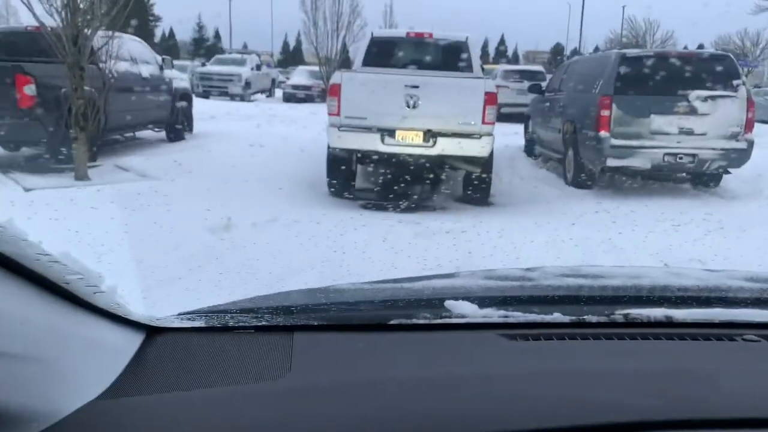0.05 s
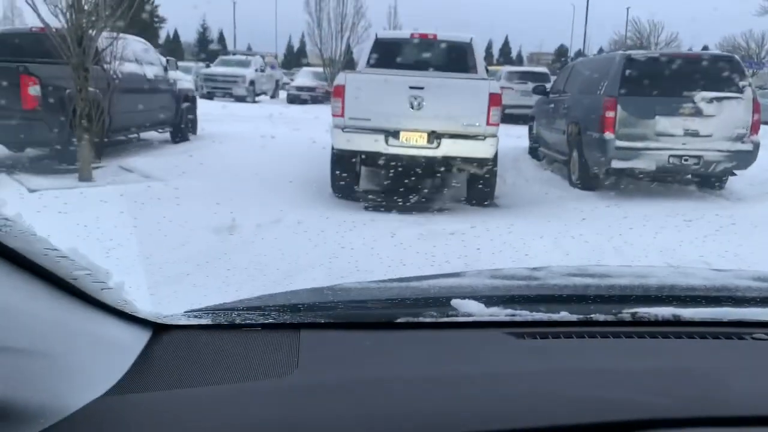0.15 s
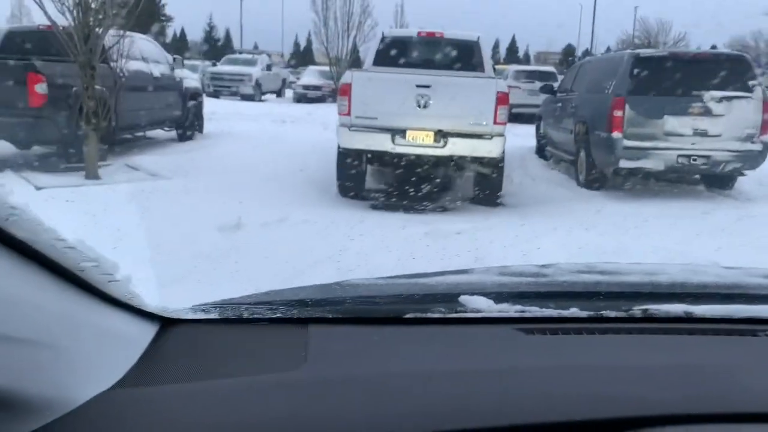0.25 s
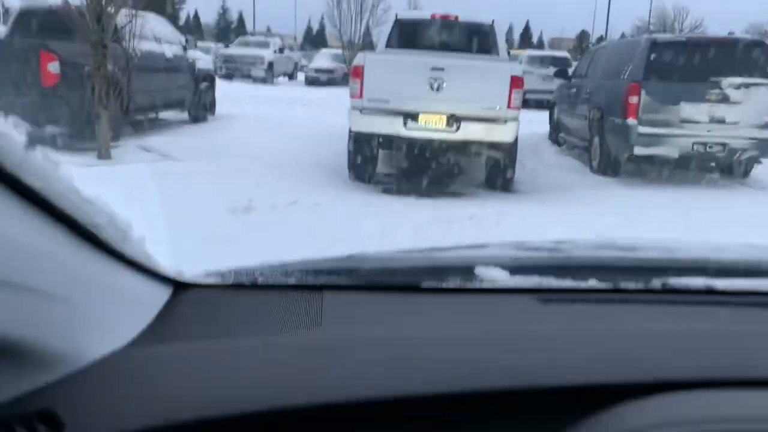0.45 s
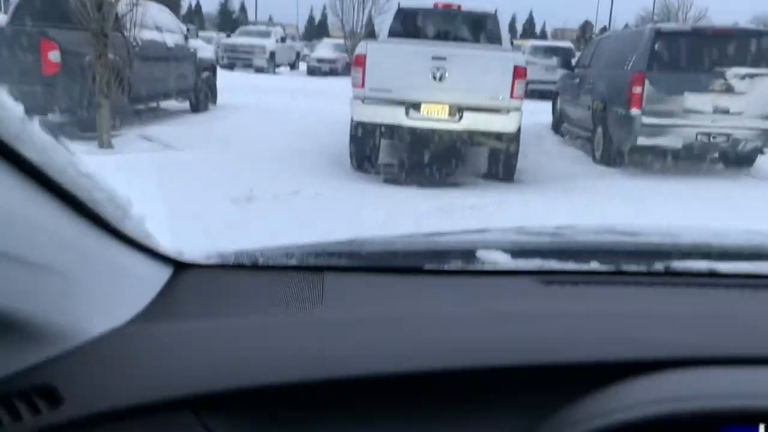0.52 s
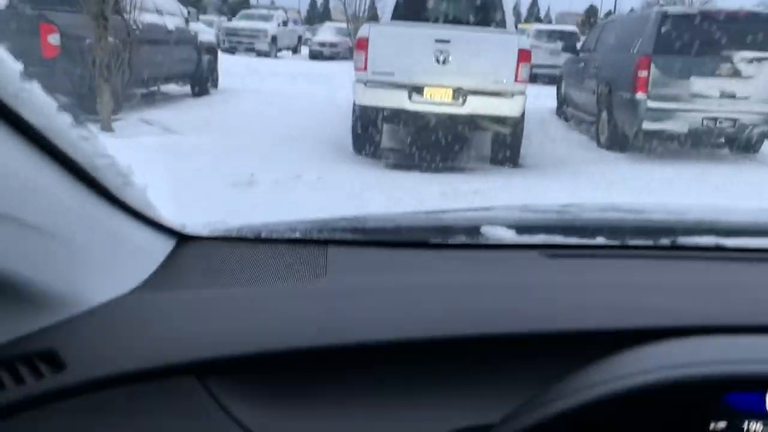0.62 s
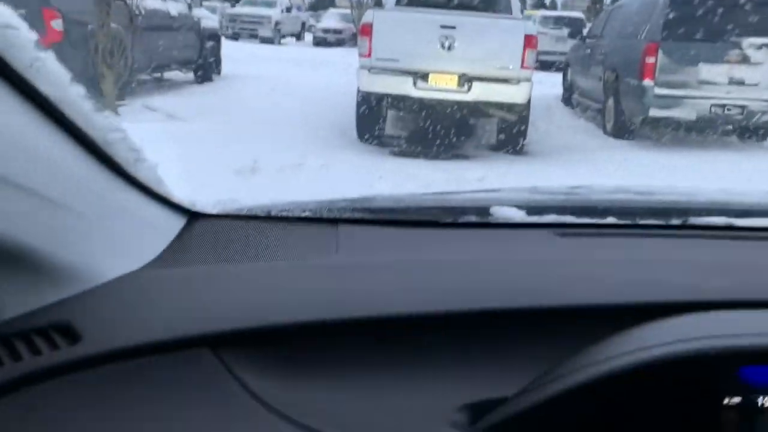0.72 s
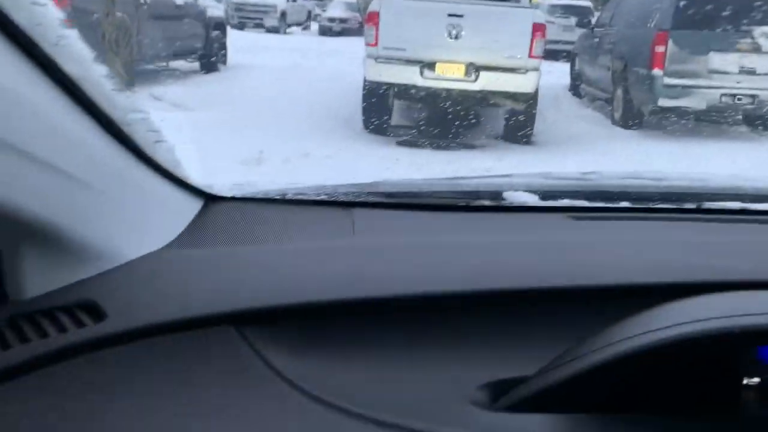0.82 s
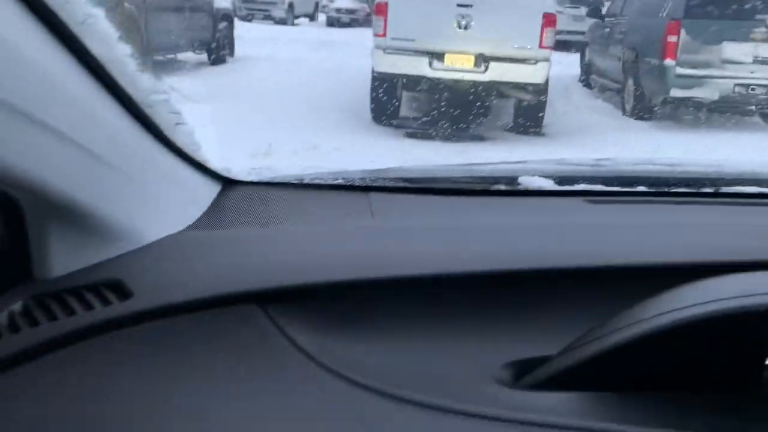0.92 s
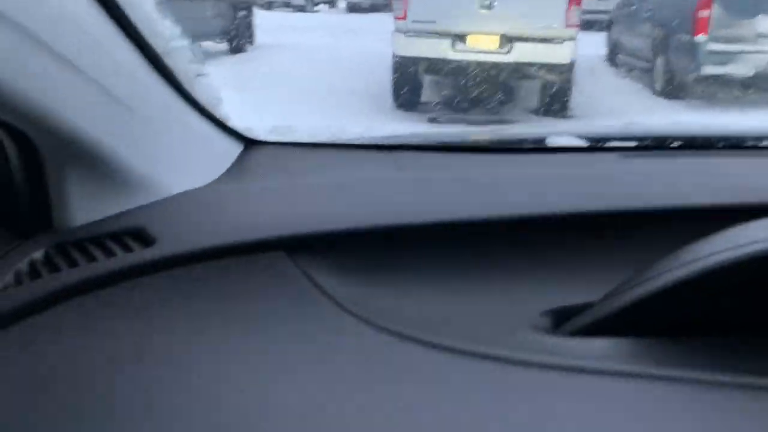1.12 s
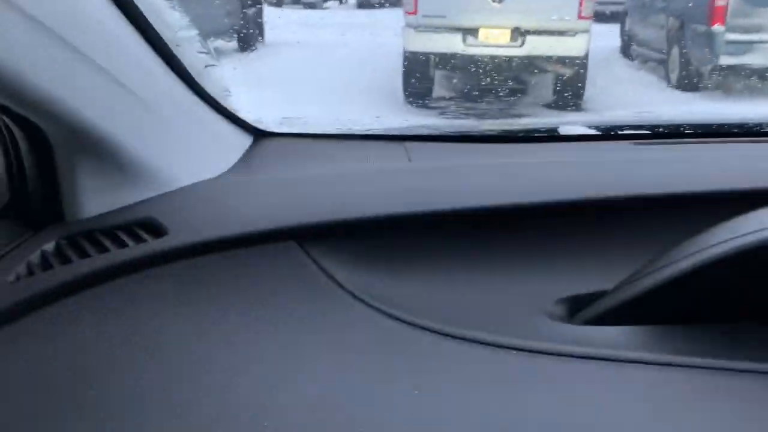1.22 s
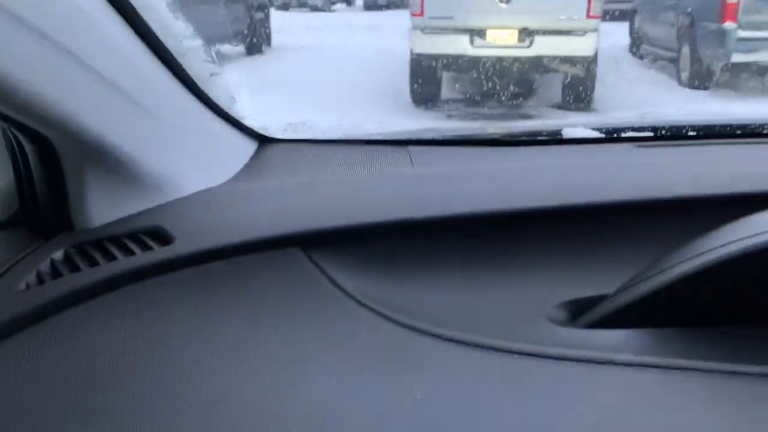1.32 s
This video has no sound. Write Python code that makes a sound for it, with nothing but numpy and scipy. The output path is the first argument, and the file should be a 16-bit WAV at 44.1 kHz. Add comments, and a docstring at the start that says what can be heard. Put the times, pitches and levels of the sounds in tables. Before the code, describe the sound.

Low thumping judder of fabric rubbing a hand-held phone inside a parked car, over dull rumble

```python
"""Handling a phone in a parked car

Inside a parked car, fabric sticks and slips against a hand-held phone with two ports in low thumping
judder: a low tone with a few multiples and loose shaking. Cloth rustles in dense tiny noise grains,
two soft knocks ring the trim, squeaks are short gliding tones and ticks are puffs of narrow noise.
Under it all lies the dull rumble of the car's fan and vents, noise with a slow swell."""
import sys
import numpy as np
from scipy import signal
from scipy.fft import rfft, irfft
from scipy.io import wavfile
from scipy.ndimage import uniform_filter1d

SR = 44100
rng = np.random.default_rng(int(sys.argv[2]) if len(sys.argv) > 2 else 0)


def wav_record(signal):
    """Record a signal, one row per channel, as 16-bit PCM in the file named by sys.argv[1]."""
    frames = np.transpose(np.atleast_2d(signal))
    bounded = np.clip(frames, -1, 1)
    # unit amplitude maps onto the largest positive 16-bit level
    quanta = np.round(bounded * 32767).astype(np.int16)
    wavfile.write(sys.argv[1], SR, quanta)


N = 59535


def undb(db):
    """Turn decibels into a plain multiplier."""
    return 10 ** (np.asarray(db) / 20)


def curve(table, column=1):
    """A table column joined by straight lines in time."""
    rows = np.array(table)
    return np.interp(np.arange(N) / SR, rows[:, 0], rows[:, column])


def over_hz(table, hz):
    """A table read on a log-frequency axis."""
    rows = np.array(table)
    return np.interp(np.log(hz + 1), np.log(rows[:, 0]), rows[:, 1])


def rms1(x):
    """Scale a sound to an average (RMS) level of 1."""
    return x / np.sqrt(np.mean(x ** 2))


def walk(rate):
    """Random levels, `rate` new ones a second, smoothed twice; spread near 1."""
    hold = int(SR / rate)
    steps = np.repeat(rng.standard_normal(N // hold + 1), hold)
    smooth = uniform_filter1d(uniform_filter1d(steps, hold), hold)
    return 1.166 * smooth[:N]


def band(x, lo_hz, hi_hz):
    """Keep only the frequencies between two limits."""
    sos = signal.butter(2, [lo_hz, min(hi_hz, .45 * SR)], "band", fs=SR, output="sos")
    return signal.sosfilt(sos, x)


def ports(shared, other, colour=None):
    """Two ports: the right hears `shared`; the left mixes it with `other`, a little late."""
    # how alike the two ports are: (frequency [Hz], likeness [0-1])
    alike_table = [(60, 0.99), (130, 1), (290, 0.84), (640, 0.5), (1400, 0.48), (3100, 0), (6000, 0.04),
                   (8000, 0.97), (16000, .995)]
    # left over right: (frequency [Hz], level [dB])
    lean_table = [(60, -0.5), (110, 3), (200, 0.5), (380, 3.5), (700, -0.5), (1290, 2.5), (2380, 1.5),
                  (4400, -0.5), (8120, -1.0), (15000, 0.5)]
    # the path round the phone's body is longer for the treble: (frequency [Hz], left lag [ms])
    lag_table = [(900, .12), (1500, .15), (8600, .1744), (11100, .1802), (13400, .1866)]
    hz = np.arange(N // 2 + 1) * SR / N
    alike = np.clip(over_hz(alike_table, hz), 0, 1)
    shape = 1 if colour is None else undb(over_hz(colour, hz))
    lean = undb(over_hz(lean_table, hz) / 2)  # half to each side
    right = rfft(shared)
    left = alike * right + np.sqrt(1 - alike * alike) * rfft(other)
    left = left * np.exp(-2j * np.pi * hz * over_hz(lag_table, hz) / 1000)
    return irfft(shape * np.array([left * lean, right / lean]), N)


def judder():
    """Fabric sticks and slips on the phone: a few multiples of the slip rate, with loose shaking."""
    # fabric judder before wobble and flicker: (time [s], slip rate [Hz], fundamental [dB],
    # second multiple [dB], third multiple [dB])
    slip_table = [(0.0, 53.1, -75, -81, -45), (0.036, 51.54, -54, -47.5, -77),
                  (0.108, 49.64, -43.5, -54, -65), (0.134, 51.06, -55, -82, -74),
                  (0.172, 50.8, -75, -61, -61), (0.194, 50.5, -51, -63, -59), (0.21, 51.9, -40, -53, -41.5),
                  (0.244, 52.1, -32, -33.5, -35.5), (0.266, 56.04, -34, -60, -53),
                  (0.284, 56.94, -38, -40, -86), (0.304, 55.94, -47.5, -58, -50.5),
                  (0.335, 56.55, -34.5, -65, -45), (0.352, 57.04, -33.5, -60, -46),
                  (0.38, 57.1, -43.5, -64, -50.5), (0.41, 57.3, -37, -64, -45.5),
                  (0.458, 57.58, -46.5, -72, -53.5), (0.496, 57.23, -41.5, -44.5, -52),
                  (0.548, 54.5, -40.5, -58, -49.5), (0.57, 54.64, -47, -50, -70),
                  (0.616, 50.71, -64, -58.5, -50), (0.65, 50.43, -49, -64, -49),
                  (0.672, 50.38, -46, -62, -44.5), (0.695, 50.3, -37.5, -57, -42),
                  (0.735, 50.16, -31, -62, -44), (0.774, 48.77, -32.5, -69, -46),
                  (0.812, 44.85, -26.5, -40, -36), (0.834, 41.8, -19.5, -43, -38),
                  (0.864, 40.8, -43, -40, -42.5), (0.886, 39.97, -32, -38.5, -64),
                  (0.91, 40.9, -41.5, -43.5, -64), (0.936, 42.15, -44, -40.5, -45),
                  (0.958, 43.52, -36, -43, -49.5), (0.986, 45.85, -25, -55, -56),
                  (1.01, 44.7, -33, -39.5, -56), (1.022, 43.72, -31.5, -69, -63),
                  (1.056, 41.42, -36.5, -51, -51), (1.09, 43.25, -57, -70, -39.5),
                  (1.142, 46.45, -41, -39, -68.5), (1.184, 47.04, -54, -52, -48),
                  (1.202, 47.3, -46.5, -59, -62.5), (1.296, 49.65, -41.5, -48, -53),
                  (1.326, 47.87, -42, -60, -64), (1.35, 45.38, -75, -62, -40.5)]
    wobble = .015  # random spread of the slip rate, as a fraction
    flicker_db, drift_rad = 1.3, 0.25  # each multiple's random level; its phase wander
    fourth_db = -10  # fourth multiple against the third
    shake_db, shake_hz = -14, (40.5, 140)  # loose shaking against the fundamental; its band
    rate = curve(slip_table) * (1 + wobble * walk(20))
    turn = 2 * np.pi * np.cumsum(rate) / SR + 2 * np.pi * rng.random()
    levels = [curve(slip_table, column=k) for k in (2, 3, 4)]
    levels.append(levels[-1] + fourth_db)
    tone = 0
    for k, level in enumerate(levels):
        loudness = np.sqrt(2) * undb(level + flicker_db * walk(35.0))
        # higher multiples wander more
        tone = tone + loudness * np.cos((k + 1) * turn + drift_rad * k * walk(13.03))
    shaking = rms1(band(band(rng.standard_normal(N), *shake_hz), *shake_hz))
    x = tone + undb(levels[0] + shake_db) * shaking
    return ports(x, np.roll(x, 60))  # shifted by 60 samples, about 1.4 ms


def rustle():
    """Cloth rubs in dense tiny fibre slips of uneven size, in a patchy flow."""
    # cloth rustle, level within 2-8 kHz before its patchiness: (time [s], level [dB])
    flow_table = [(.015, -65.5), (.045, -88), (.09, -84), (.13, -75), (.17, -66), (.23, -76), (.35, -71.5),
                  (.45, -75), (.56, -74), (.65, -69.5), (.72, -66), (.79, -62), (.87, -65), (.95, -68.5),
                  (1.03, -72.5), (1.07, -90), (1.12, -81), (1.16, -104), (1.33, -92)]
    # colour of the cloth: (frequency [Hz], relative level [dB per Hz])
    cloth_colour = [(500, -18), (900, -3.5), (1300, 0), (2000, -3), (3000, -7), (4000, -5), (5200, -9),
                    (6700, -10), (8000, -12), (10000, -14.5), (12500, -27), (16000, -15.5)]
    grains_per_s, grain_spread_db = 6000, -0.5  # the spread is the average weakening of a grain
    grains = []
    for _ in range(2):
        happens = rng.random(N) < grains_per_s / SR
        size = undb(grain_spread_db * rng.exponential(size=N))
        grains.append(rng.standard_normal(N) * happens * size)
    x = ports(grains[0], grains[1], cloth_colour)
    x = x / np.std(band(x, 2000, 8000))
    return x * undb(curve(flow_table) + 1.14 * walk(13.23))


def knocks():
    """A soft push rings the trim at several pitches, each dying away at its own pace."""
    # soft knocks: (time [s], drive level [dB], left over right [dB], left late by [ms],
    # frequency where the ring is halved, duller above [Hz])
    knock_table = [(.2, -42.5, 8.5, 0.028, 636), (1.0348, -40.5, 1.5, 0.28, 3000)]
    # ringing modes of the trim: (frequency [Hz], relative level [dB], time to fall 60 dB [s])
    trim_modes = [(526, 5.5, 0.023), (640, -1.5, 0.013), (787, -2.5, 0.031), (950, -2, 0.015),
                  (1200, -8, 0.015), (2450, -11, 0.011)]
    soft_order = 6  # how steeply a soft knock loses the upper modes
    out = 0
    for at, db, pan_db, lag_ms, soft_hz in knock_table:
        late = np.array([[lag_ms / 1000], [0]])
        t = np.maximum(np.arange(N) / SR - at - late, 0)
        ring = 0
        for hz, mode_db, t60 in trim_modes:
            strength = undb(mode_db) / (1 + (hz / soft_hz) ** soft_order)
            ring = ring + strength * np.sin(2 * np.pi * hz * t) * undb(-60 * t / t60)
        sides = np.array([[pan_db], [-pan_db]]) / 2
        onset = 1 - np.exp(-t / 0.00065)  # a rounded start
        out = out + undb(db + sides) * ring * onset
    return out


def squeaks():
    """Rubbing surfaces sing a short wavering tone."""
    # squeaks: (time of the middle [s], RMS level there before flicker [dB], pitch there [Hz],
    # glide [Hz per s], length [s], left over right [dB], left wave late by [ms], early if negative)
    squeak_table = [(0.7565, -56, 3910, 9002, 0.008, 3, -0.063), (0.783, -63, 3760, -5000, 0.0111, -3, .01),
                    (0.872, -62, 1315, 2200, 0.036, 5, -0.065),
                    (0.886, -60.5, 1345, -300, 0.026, 4, -0.054), (0.9, -62, 1250, -900, 0.04, 3, -0.0037),
                    (0.874, -61.5, 880, 900.5, 0.036, -2.5, -.03),
                    (0.85, -67.5, 4940, 0.5, 0.013, -3, -0.036), (0.95, -69, 1245, -150, 0.13, 1.5, 0.0027)]
    waver, flicker_db = 0.011, 2.5  # random spread of pitch, as a fraction; of level
    t, out = np.arange(N) / SR, 0
    for at, db, hz, glide, length, pan_db, lag_ms in squeak_table:
        pitch = (hz + glide * np.clip(t - at, -length, length)) * (1 + waver * walk(150))
        swell = np.exp(-.5 * ((t - at) / (length / 3)) ** 2)
        shape = undb(db + flicker_db * walk(59.96)) * swell
        cycles = np.cumsum(pitch) / SR - np.array([[hz * lag_ms / 1000], [0]])
        sides = undb(np.array([[pan_db], [-pan_db]]) / 2)
        out = out + np.sqrt(2) * shape * sides * np.sin(2 * np.pi * cycles)
    return out


def ticks():
    """Short puffs of noise, each in one narrow range of pitch."""
    # ticks: (time of the middle [s], noise level there before the ports [dB], centre [Hz],
    # width [Hz], length [s])
    tick_table = [(0.092, -59.5, 1320, 303, 0.0091), (.166, -63.5, 7000, 1490, 0.0048),
                  (.167, -68, 10400, 1200, 0.0077), (.168, -70, 15100, 1200, .014),
                  (0.667, -65.5, 3470, 2510, 0.015), (0.792, -67, 4460, 391.6, 0.048),
                  (0.796, -63, 6720, 876, 0.015), (0.854, -63, 9770, 610, 0.028),
                  (0.882, -71, 6450, 300, 0.085), (1.111, -78.5, 7810, 3030, 0.06),
                  (1.327, -50, 370, 110, 0.022)]
    t, shared, other = np.arange(N) / SR, 0, 0
    for at, db, hz, width, length in tick_table:
        shape = undb(db) * np.exp(-.5 * ((t - at) / (length / 3)) ** 2)
        lo_hz, hi_hz = hz - width / 2, hz + width / 2
        shared = shared + shape * rms1(band(rng.standard_normal(N), lo_hz, hi_hz))
        other = other + shape * rms1(band(rng.standard_normal(N), lo_hz, hi_hz))
    return ports(shared, other)


def rumble():
    """The car's fan and vents: dull noise whose octaves flicker on their own under a shared swell."""
    # colour of fan and vents: (frequency [Hz], relative level [dB per Hz])
    rumble_colour = [(20, -34), (38, -3), (70, -3), (105, -6), (150, -9.5), (210, -14), (320, -15),
                     (420, -18), (500, -21.5), (545, -18), (600, -26.5), (750, -30.5), (980, -30),
                     (1100, -33.5), (1400, -35.5), (1570, -38), (1610, -30), (1680, -41.5), (2200, -48),
                     (4000, -53), (7500, -58.5), (9000, -54), (16000, -57)]
    # rise and fall, used about its own average: (time [s], level [dB])
    swell_table = [(0.0, -44), (0.052, -53), (0.248, -50), (0.364, -52), (0.788, -51), (1.318, -56),
                   (1.326, -58.5), (1.35, -48)]
    rumble_db = -45  # middle level of the swell
    noise = ports(rng.standard_normal(N), rng.standard_normal(N), rumble_colour)
    spectrum = rfft(noise)
    octave = np.log2(np.arange(N // 2 + 1) * SR / N + 1)
    x = 0
    for k in range(3, 16):
        weight = np.clip(1 - abs(octave - k), 0, 1)  # neighbouring octaves overlap
        x = x + irfft(spectrum * weight, N) * undb(0.71 * walk(8.2))
    swell = curve(swell_table)
    return rms1(x) * undb(rumble_db + swell - swell.mean())


def scene():
    """All the sounds inside the car together."""
    return judder() + rustle() + knocks() + squeaks() + ticks() + rumble()


def record(dry):
    """The sound starts and stops softly; the phone cuts the top."""
    edge_s, top_hz = .006, 15800  # fade at each end; highest pitch let through
    t = np.arange(N) / SR
    x = dry * np.clip(np.minimum(t, t[::-1]) / edge_s, 0, 1)
    return signal.sosfilt(signal.ellip(10, .2, 80, top_hz, fs=SR, output="sos"), x)


dry = scene()
out = record(dry)
wav_record(out)
```